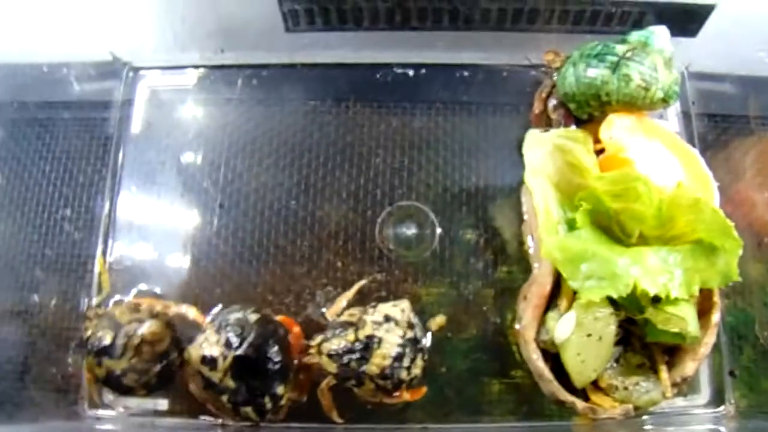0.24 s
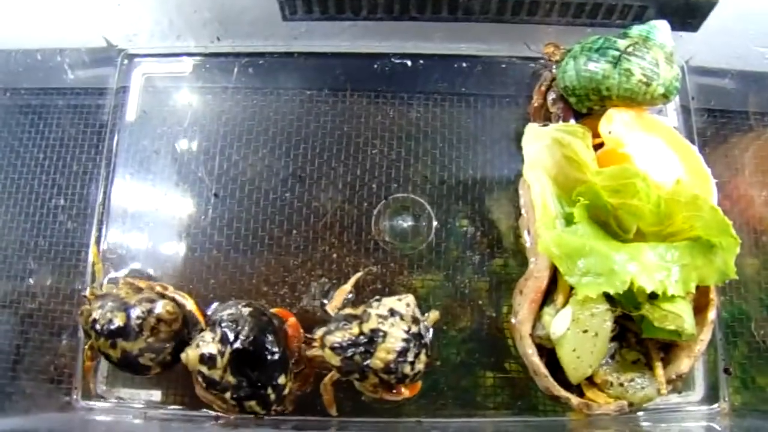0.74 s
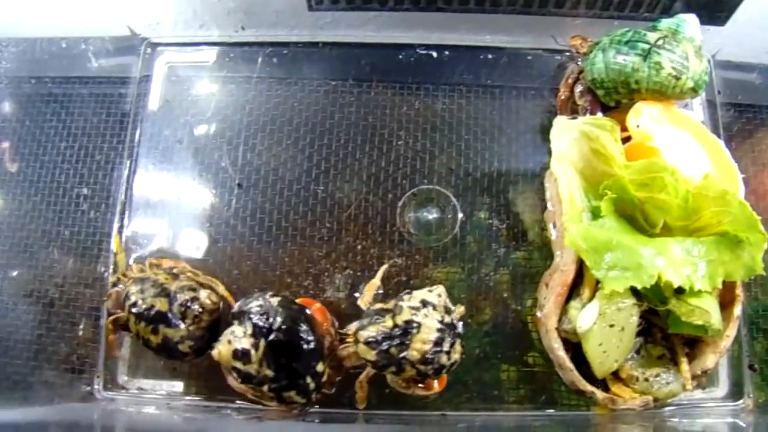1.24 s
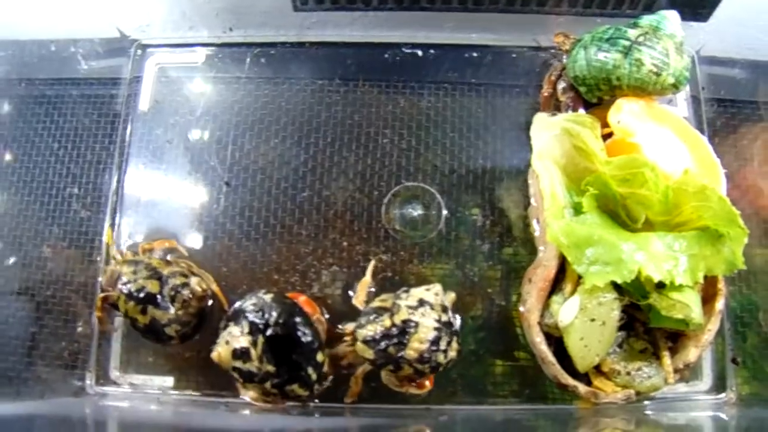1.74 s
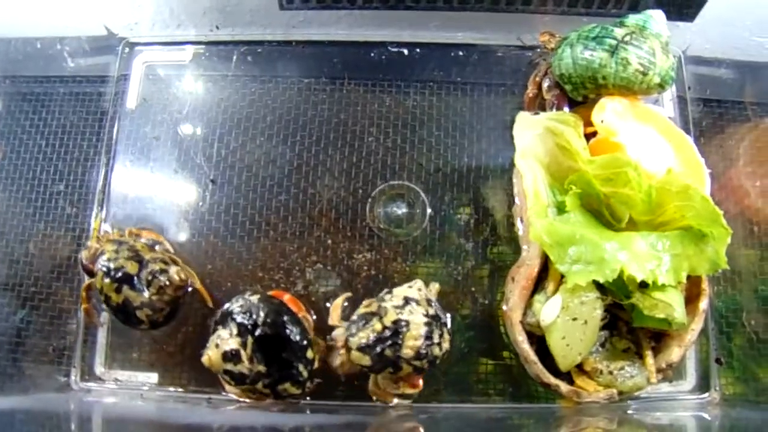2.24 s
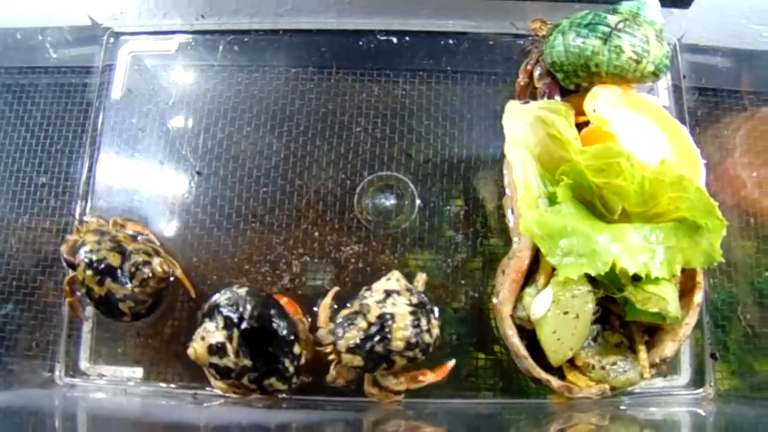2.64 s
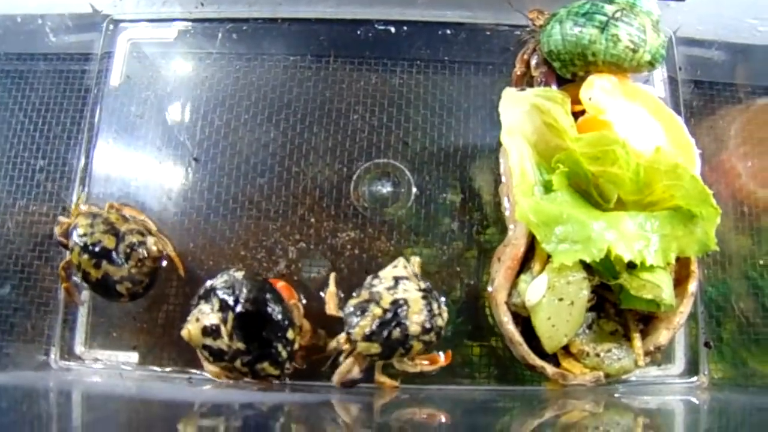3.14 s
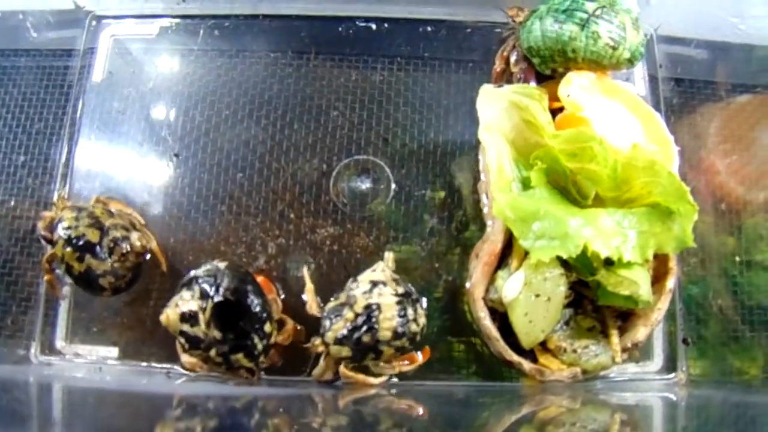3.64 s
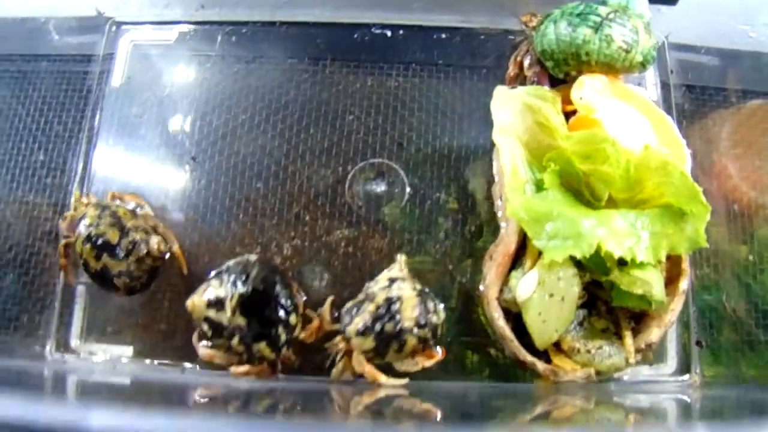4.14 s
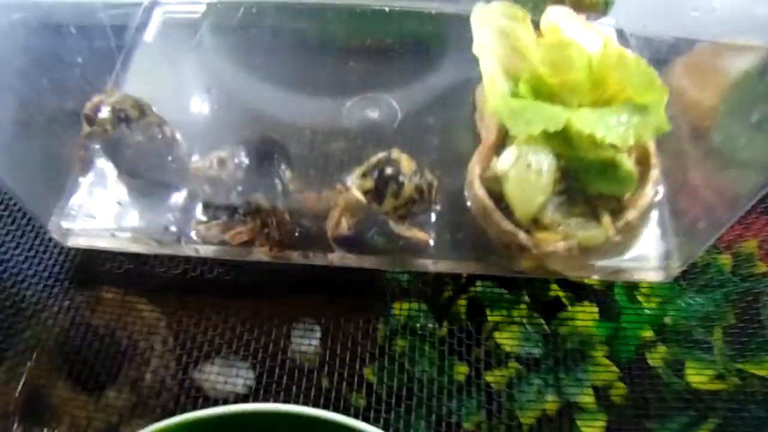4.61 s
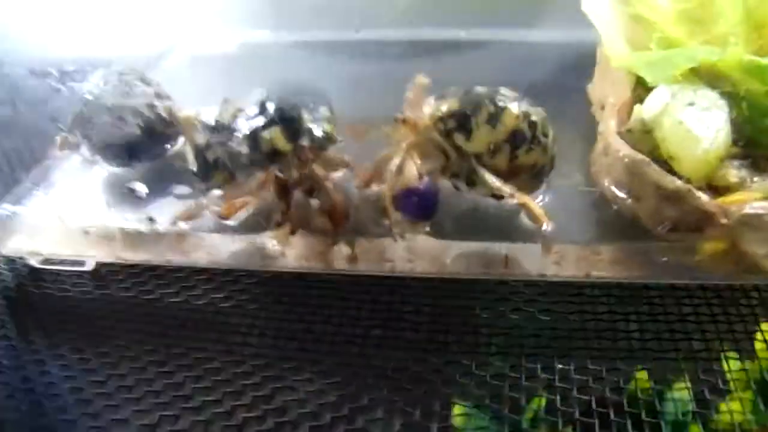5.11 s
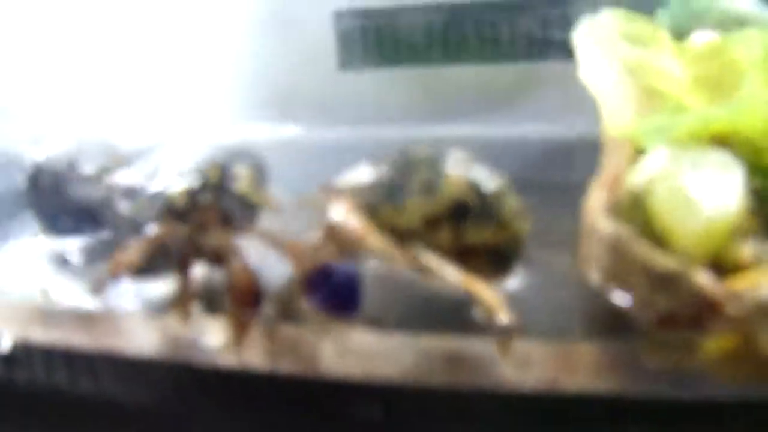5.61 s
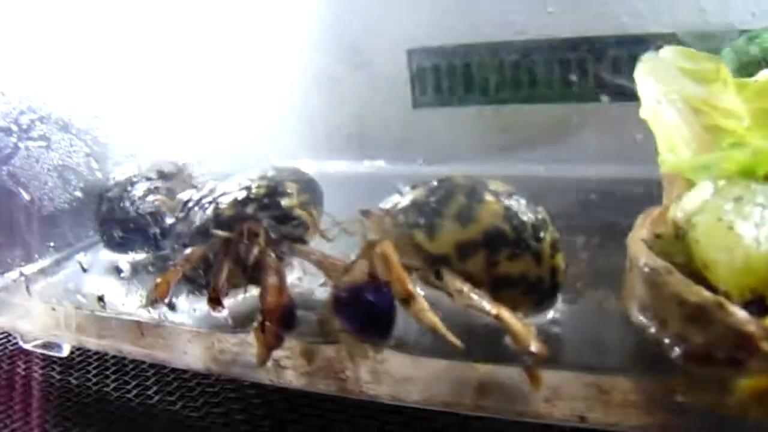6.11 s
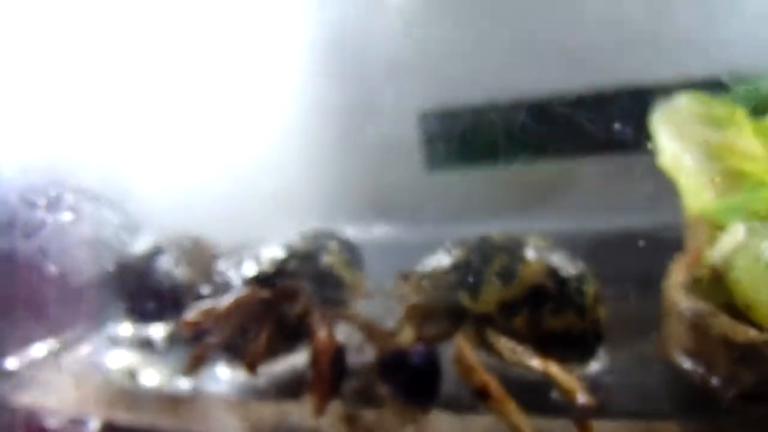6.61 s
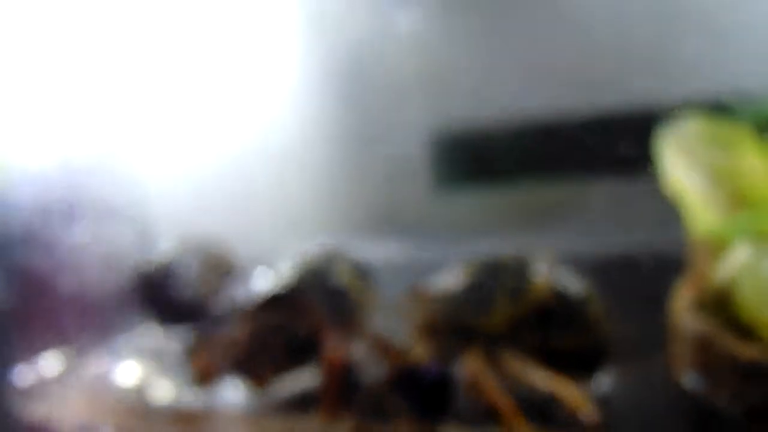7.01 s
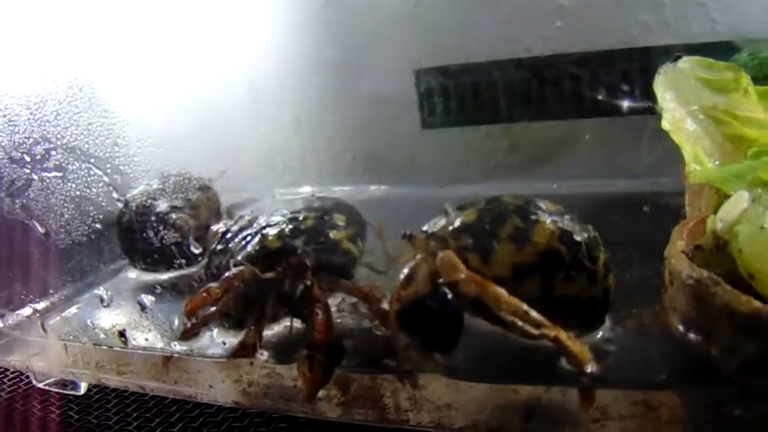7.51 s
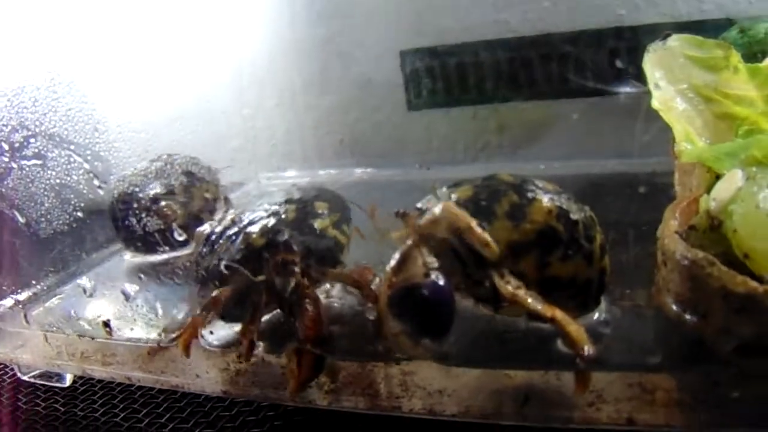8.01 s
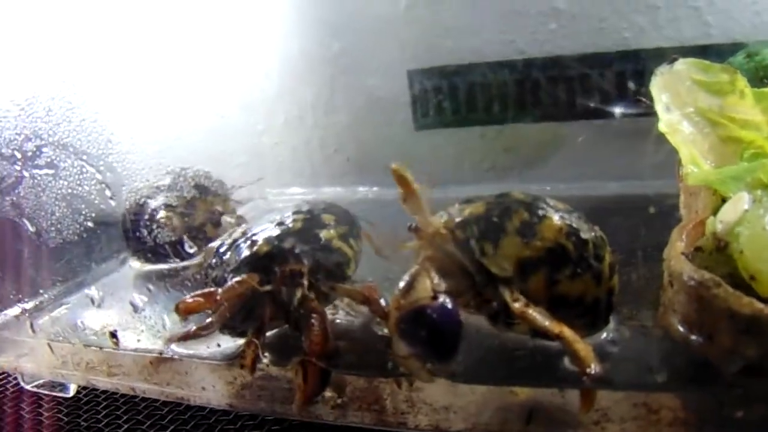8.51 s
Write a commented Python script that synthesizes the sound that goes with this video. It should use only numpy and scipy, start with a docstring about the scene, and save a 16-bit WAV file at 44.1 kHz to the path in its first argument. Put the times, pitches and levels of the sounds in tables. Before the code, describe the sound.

Close, single-channel sound in a quiet room with steady hiss and wavering hum. Hard shells groan briefly across thin plastic, then one drops with a sharp double crack that rings the tub and distorts. A sparse stretch of light leg ticks follows, then irregular shell clicks, dull scuffs and hollow bumps from the middle onward. Rapid camera-motor purrs come and go, and a faint thin whine emerges late.

```python
"""Hermit crabs walk in a thin plastic tub, close under a camera, in a quiet humming room.
From the start the lens motor flutters in bursts (stepped resonances), shells drag (stick-slip) and leg tips tick
(brief impacts). At 1 s a shell drops with a loud clack: it rings the tub, overloads the input and ducks the gain.
Ticks go on, and shells click (damped resonance); from 4.5 s they jostle, shift the tub with dull scuffs and bump
it (knock and floor boom). Hiss, hum and rumble (noise and wavering sines) last throughout; late, a whine fades in."""
import sys
import numpy as np
from scipy import signal
from scipy.io import wavfile
from scipy.ndimage import uniform_filter1d

SR = 44100
rng = np.random.default_rng(int(sys.argv[2]) if len(sys.argv) > 2 else 0)


def to_wav(sig):
    """Store sig (one row per channel, or 1-D mono) as 16-bit WAV at the path in sys.argv[1].

    Samples outside -1..1 are clipped; the rate is SR.
    """
    pcm = np.clip(np.atleast_2d(sig), -1, 1) * 32767
    pcm = np.round(pcm).astype(np.int16)
    wavfile.write(sys.argv[1], SR, pcm.T)  # frames by channels


N = 385875
TIME = np.arange(N) / SR  # s

# Levels in the tables are relative within each kind of sound.
# A shell landing and chattering on the floor: (time [s], level [dB])
DROP_IMPACTS = [(1.0163, -1.5), (1.0195, 0.5), (1.0237, -9.5)]
# Shells bumping the tub: (time [s], level [dB], main pitch [Hz])
TUB_BUMPS = [(4.563, -38, 215), (5.928, -14, 850), (5.940, -19, 518), (6.218, -18, 425),
             (6.367, -26.5, 185), (6.687, -19.5, 1290), (6.690, -18.5, 328), (6.691, -19.5, 547),
             (7.704, -30.5, 199), (8.038, -35, 300)]
# Single touches of shell on shell: (time [s], level [dB], main pitch [Hz], 60 dB decay [s])
SHELL_TOUCHES = [(0.311, -29, 1510, .03), (1.867, -32, 780, .02), (3.272, -34.5, 1520, 0.081),
                 (3.482, -34, 1550, .12), (4.717, -28, 1440, 0.023), (4.887, -32, 1830, .02),
                 (4.939, -23, 1000, 0.025), (5.163, -28.5, 1820, 0.052), (5.761, -30.5, 1186, 0.022),
                 (5.965, -24.5, 1510, 0.11), (6.306, -31, 1270, 0.045), (6.898, -35, 1820, .03),
                 (6.921, -27, 1260, 0.029)]
# Spells of many light shell touches: (start time [s], end time [s], rate [1/s], level [dB])
JOSTLING = [(4.569, 5.25, 14, -36.5), (5.471, 5.55, 43, -36.5), (7.529, 7.6, 30, -38)]
# Hard ticks on plastic: bright ones of leg tips, and duller, steeply tilted snaps of shell rims: (time [s],
# level [dB], 60 dB decay [s], spectral tilt [dB/octave])
TICKS = [(0.152, -35, .07, 1), (0.287, -32, 0.065, -3.5), (0.311, -37, .025, -4.5),
         (0.341, -27.5, .02, -6), (0.985, -37, .06, 2), (2.380, -41.5, .03, 1), (2.982, -27, 0.053, 2),
         (3.481, -30, 0.042, -3), (4.031, -37, .03, 8), (4.420, -35.5, .04, 3.5),
         (5.324, -37.5, .05, 1), (5.760, -38.5, .03, 0), (5.947, -25, 0.02, -6),
         (6.503, -39, .06, -1.5), (6.687, -34.5, .04, -5), (7.703, -29.5, .09, 1.5),
         (7.808, -26.5, 0.017, 0.5), (8.268, -39.5, .045, 1.5)]
# Legs sliding over plastic: (time of maximum [s], length [s], level [dB], spectral tilt [dB/octave])
LEG_SLIDES = [(0.29, .6, -56, -0.5), (0.87, .3, -58, 1), (3.455, .15, -53, -1.5), (5.501, 0.24, -51.5, 0),
              (6.009, 0.055, -48.5, 4), (6.089, 0.094, -49.5, 1), (6.36, .13, -43.5, 0.5),
              (8.03, 0.4, -54, 3), (8.499, 0.16, -53.5, -0.5)]
# Shells dragged along: (time of maximum [s], length [s], level [dB], squeak [Hz])
SHELL_DRAGS = [(0.167, 0.074, -43.5, 570), (0.223, .34, -44.5, 807), (0.321, .13, -36.5, 568),
               (0.543, .1, -50, 720), (0.835, .16, -44, 1006)]
# Tub resonances sung under every drag: (frequency [Hz], width [Hz], level [dB])
GROAN_RESONANCES = [(414, 26, -3), (1510, 32, -12)]
# The tub shifting: (time of maximum [s], length [s], level [dB])
TUB_SCUFFS = [(4.572, .3, -52), (4.948, .5, -50), (6.233, .2, -41.5), (6.37, .24, -41), (7.72, .12, -48.5),
              (8.051, .22, -46)]
# Runs of the lens motor: (start time [s], end time [s], level [dB], mount singing relative to body [dB])
MOTOR_RUNS = [(0.002, 0.09, -50, -23), (0.399, 0.55, -50, -13.5), (1.567, 1.85, -47, -13),
              (4.369, 5.12, -49, -26), (5.137, 5.65, -55, -5), (5.834, 7.42, -53, -5),
              (7.479, 7.66, -53, -14)]
# Resonances of the camera body: (frequency [Hz], nominal width [Hz], level [dB])
CAMERA_RESONANCES = [(325.7, 38.2, -0.5), (453, 107, -8), (692, 120, -6.5), (847, 120, -13.5),
                     (1043, 55, -11.5), (7410, 410, -22.5)]
# Modes of the tub, and of its loaded floor, before any tilt: (frequency [Hz], level [dB], 60 dB decay [s])
TUB_MODES = [(277.8, -20.5, 0.45), (408, 0, 0.12), (496.7, -12, .12), (534, -6, 0.13), (590, -5, .17),
             (602, -11.5, 0.31), (817, -11, .18), (972, -11, 0.1), (1090, -18.5, 0.13), (1175, -18.5, .16),
             (1310, -18, .13), (1530, -15, 0.11), (1600, -7.5, .11), (1745, -12.5, 0.11), (1825, -11, 0.18),
             (2037, -5, .085), (2100, -10, 0.11), (2196, -9, .08), (2320, -7.5, .09), (2724, -10.5, .085),
             (3094, -8, 0.074), (3700, -11.5, 0.083), (3950, -7, .06), (4612, -7.5, 0.067), (5980, -5, .05)]
FLOOR_MODES = [(114, -9, 0.16), (184, -1, 0.44), (208.7, -6, 0.52), (256, -19, 0.099), (339, 0, 0.19),
               (418, -3.5, 0.27), (529, -4.5, 0.53)]
# Spectra before any tilt, of the drop, bumps, clicks, ticks, drags, slides, scuffs and room hiss:
# (frequency [Hz], relative density [dB per Hz])
CRACK_SPECTRUM = [(40, -42), (130, -25.5), (230, -10.5), (420, 3), (900, -3.5), (1300, -4), (2000, 0.5),
                  (6000, -3.5), (14000, -7.5)]
BUMP_SPECTRUM = [(40, -23), (110, -6.5), (190, 4), (500, -4), (1000, -3), (1400, -2.5), (2000, -8.5),
                 (3000, -18), (7000, -29.5), (14000, -46)]
CLICK_SPECTRUM = [(150, -12), (600, -0.5), (1100, 1), (1500, -3.5), (2000, -2), (2700, -10), (3600, -16),
                  (6000, -29), (14000, -42)]
TICK_SPECTRUM = [(200, -14), (1200, -5.5), (3000, 1.5), (7000, -0.5), (13000, -1.5)]
DRAG_SPECTRUM = [(100, -33.5), (280, -11), (420, -2), (900, -0.5), (1600, -9), (3500, -17.5), (7000, -26),
                 (14000, -40)]
SLIDE_SPECTRUM = [(100, -12), (400, -8), (1300, -1), (3000, -7.5), (7000, -10), (14000, -13)]
SCUFF_SPECTRUM = [(40, -8), (110, -4.5), (200, 2), (330, -5), (550, -9.5), (1000, -12), (2500, -25),
                  (14000, -57)]
AIR_SPECTRUM = [(15, -12), (28, -4.5), (62, -4.5), (85, -7), (160, -7.5), (420, -4.5), (760, -10.5),
                (1100, -13.5), (2000, -14.5), (3700, -18.5), (8000, -21.5), (14000, -23)]
# Course of the low rumble: (time [s], level [dB])
RUMBLE_LEVEL = [(0.0, -61), (2.22, -61), (3.46, -55), (4.43, -66), (4.92, -57.5), (8.75, -59)]
# Steady room tones and the late whine: (mean frequency [Hz], level [dB])
HUM_TONES = [(119, -65), (410, -74), (861, -76.5), (2008, -79)]
WHINE_TONES = [(502, -71.5), (1006, -68.5), (1508, -73)]


def amp(db):
    """Level to amplitude: 20 dB is a factor of ten."""
    return 10 ** (np.asarray(db) / 20)


def evened(x):
    """Normalization to an rms of 1."""
    return x / np.sqrt(np.mean(x ** 2) + 1e-20)


def peaked(x):
    """Short-time normalization: the loudest 2 ms get an rms of 1."""
    return x / np.sqrt(uniform_filter1d(x ** 2, size=88).max())


def add(mix, s, sound):
    """Superposition: the sound is added to the mix from time s [s]."""
    start = max(round(s * SR), 0)
    part = mix[start:start + len(sound)]
    part += sound[:len(part)]


def decay(t60, count):
    """Exponential decay: the amplitude falls by 60 dB in t60 [s]."""
    return np.exp(-np.log(1000) * np.arange(count) / SR / t60)


def colour(x, spectrum, tilt_db=0, size=2048):
    """Minimum-phase filtering: the log gain fixes the phase; the spectrum is tilted by tilt_db per octave."""
    octave = np.log2(abs(np.fft.fftfreq(size, 1 / SR)) + 1)
    hz, db = np.transpose(spectrum)
    tilted_db = db + tilt_db * np.log2(hz / hz[-1])
    log_gain = np.log(amp(np.interp(octave, np.log2(hz), tilted_db)))
    taps = np.fft.ifft(np.exp(np.conj(signal.hilbert(log_gain)))).real
    return signal.fftconvolve(x, taps[:size // 2])[:len(x)]


def resonate(x, hz, width):
    """Simple resonance: a band of the given width passes, with gain 1 at its centre."""
    return signal.lfilter(*signal.iirpeak(hz, max(hz / width, .5), SR), x)


def ring(modes, tilt_db=0, count=16000):
    """Modal superposition: a struck body sounds as decaying sines, tilted by tilt_db per octave."""
    t = np.arange(count) / SR
    lowest_hz = modes[0][0]
    out = np.zeros(count)
    for hz, db, t60 in modes:
        level = amp(db + tilt_db * np.log2(hz / lowest_hz))
        sign = rng.choice([-1, 1])
        out += sign * level * decay(t60, count) * np.sin(2 * np.pi * hz * t)
    return out


def contact(t60, snap, count=6000):
    """Impact excitation: one sharp impulse and a dying noise of tiny ones, of unit energy."""
    chatter = rng.standard_normal(count) * decay(max(t60, .004), count)
    chatter /= np.linalg.norm(chatter)
    chatter[0] += snap
    return chatter / np.linalg.norm(chatter)


def friction(top, length, rise, grain_db):
    """Stick-slip friction: uneven grains, and a stroke that swells, then fades: (start [s], grains, stroke)."""
    u = np.arange(0, length, 1 / SR) / length
    slips = evened(uniform_filter1d(rng.standard_normal(len(u)), size=130))  # smoothed over 3 ms
    grains = evened(rng.standard_normal(len(u)) * amp(grain_db * slips))
    stroke = np.minimum(u / rise, ((1 - u) / (1 - rise)) ** 1.6)  # rise is a share of the length
    return top - rise * length, grains, stroke


def scatter(start, end, per_s, db, spread_db):
    """Jittered succession: one contact at random in each turn: rows (time [s], level [dB], shade -1 to 1)."""
    turns = np.arange(start, end, 1 / per_s)
    late, size, shade = rng.random((len(turns), 3)).T
    return zip(turns + late / per_s, db + spread_db * (2 * size - 1), 2 * shade - 1)


def shell_drop():
    """Impact on a resonant body: the shell cracks down, chatters, and excites all modes of the tub."""
    out = np.zeros(N)
    for s, db in DROP_IMPACTS:
        crack = colour(contact(0.034, snap=0.18), CRACK_SPECTRUM, tilt_db=0.9)
        add(out, s, amp(db) * peaked(crack))
    landing = DROP_IMPACTS[1][0]
    echoes = colour(contact(.2, snap=0, count=12000), CRACK_SPECTRUM, tilt_db=-1.5)  # in the tub
    room_tail = colour(contact(0.42, snap=0, count=24000), DRAG_SPECTRUM, tilt_db=-3.5)
    add(out, landing, amp(-5.0) * peaked(ring(TUB_MODES)))
    add(out, landing, amp(-31.5) * peaked(echoes))
    add(out, landing, amp(-33.0) * peaked(room_tail))
    return out


def bumps():
    """Coupled resonators: a shell knocks on the tub, the floor booms on, the walls ring, the room answers."""
    out = np.zeros(N)
    soft_hz = 195  # low bumps are soft: longer rattle, louder and deeper boom
    for s, db, hz in TUB_BUMPS:
        octaves = np.log2(hz / soft_hz)
        rattle_s = 0.087 * (hz / soft_hz) ** -0.6
        knock = colour(contact(rattle_s, snap=0.59, count=16000), BUMP_SPECTRUM)
        knock = peaked(knock + 4.9 * resonate(knock, hz, 48))
        boom = amp(-7 - 5 * octaves) * peaked(ring(FLOOR_MODES, tilt_db=-1 + 3.4 * octaves))
        walls = amp(-18) * peaked(ring(TUB_MODES, tilt_db=-3.0))
        tail = colour(contact(.35, snap=0, count=16000), DRAG_SPECTRUM, tilt_db=-1.5)
        add(out, s, amp(db - 6) * (knock + boom + walls + amp(-26) * peaked(tail)))
    return out


def shell_clicks():
    """Damped resonance: shells touch, giving a short click with one emphasized pitch."""
    out = np.zeros(N)
    touches = list(SHELL_TOUCHES)
    middle_hz, spread_octaves, light_t60 = 1610, .35, .03
    for spell in JOSTLING:
        for s, db, shade in scatter(*spell, spread_db=0.5):
            touches.append((s, db, middle_hz * 2 ** (spread_octaves * shade), light_t60))
    for s, db, hz, t60 in touches:
        touch = colour(contact(t60, snap=0.45), CLICK_SPECTRUM)
        add(out, s, amp(db - 8.0) * peaked(touch + 1.5 * resonate(touch, hz, 256)))
    return out


def legs():
    """Impact and sliding friction: hard leg tips and shell rims tick on the plastic, and legs now and then
    slide over it."""
    out = np.zeros(N)
    ticks = list(TICKS)
    for s, db, shade in scatter(start=2.0, end=8.7, per_s=2.2, db=-46, spread_db=2):  # lighter steps
        ticks.append((s, db, .035, 2.5 * shade))
    for s, db, t60, tilt_db in ticks:
        tick = colour(contact(t60, snap=0.31), TICK_SPECTRUM, tilt_db)
        add(out, s, amp(db - 6.0) * peaked(tick))
    for top, length, db, tilt_db in LEG_SLIDES:
        start, grains, stroke = friction(top, length, rise=.22, grain_db=3.0)
        add(out, start, amp(db) * stroke * evened(colour(grains, SLIDE_SPECTRUM, tilt_db)))
    return out


def drags():
    """Friction-driven resonance: a dragged shell rubs the tub's modes into a groan, with squeak and grit."""
    out = np.zeros(N)
    body = ring(TUB_MODES)
    for top, length, db, squeak_hz in SHELL_DRAGS:
        start, grains, stroke = friction(top, length, rise=.3, grain_db=3.5)
        rung = signal.fftconvolve(grains, body)[:len(grains)]
        rubbed = 0.42 * evened(rung) + evened(grains)
        sound = evened(colour(rubbed, DRAG_SPECTRUM))
        sound += amp(-17.5) * evened(colour(grains, TICK_SPECTRUM))  # grit
        for hz, width, sing_db in GROAN_RESONANCES + [(squeak_hz, 45, -8)]:
            sound += amp(sing_db) * evened(resonate(resonate(grains, hz, width), hz, 3 * width))
        add(out, start, amp(db) * stroke * sound)
    return out


def scuffs():
    """Low-frequency friction: the whole tub shifts a little, and the dull rubbing partly rings in its floor."""
    out = np.zeros(N)
    body = ring(FLOOR_MODES)
    for top, length, db in TUB_SCUFFS:
        start, grains, stroke = friction(top, length, rise=.2, grain_db=3)
        rung = signal.fftconvolve(grains, body)[:len(grains)]
        sound = evened(colour(grains, SCUFF_SPECTRUM)) + 0.56 * evened(rung)
        add(out, start, amp(db) * stroke * sound)
    return out


def focus_motor():
    """Periodic excitation: near-even lens steps, each a short rasp ringing in the camera body and lens mount."""
    steps_per_s = 30
    rasps = np.array([contact(.04, snap=.7, count=3500) for _ in range(24)])

    def rung(hz, width):
        """Cascaded resonance: each rasp rings at one frequency, with unit energy."""
        wave = resonate(resonate(rasps, hz, 1.18 * width), hz, 4 * width)
        return wave / np.linalg.norm(wave, axis=1, keepdims=True)

    body = sum(amp(db) * rung(hz, width) for hz, width, db in CAMERA_RESONANCES)
    mount = rung(673, 28.8)
    unit_power = np.sqrt(SR / steps_per_s)  # unit energy per step becomes unit mean power
    out = np.zeros(N)
    for start, end, db, sing_db in MOTOR_RUNS:
        for s in np.arange(start, end, 1 / steps_per_s):
            late, size = rng.standard_normal(2)
            pick = rng.integers(len(rasps))
            step = unit_power * (body[pick] + amp(sing_db) * mount[pick])
            add(out, s + .0013 * late, amp(db - 3.0 + 0.53 * size) * step)
    return out


def wavering_tone(hz, db, waver_hz):
    """Frequency modulation: a sine whose frequency drifts at random about its mean."""
    drift = np.interp(TIME, np.linspace(0, TIME[-1], num=80), rng.standard_normal(size=80))
    phase = 2 * np.pi * np.cumsum(hz + waver_hz * drift) / SR
    return amp(db) * np.sqrt(2) * np.sin(phase)


def room():
    """Background noise and tones: filtered hiss, a swelling low rumble, a wavering hum and a thin late whine."""
    air = amp(-54.5) * evened(colour(rng.standard_normal(N), AIR_SPECTRUM, size=8192))
    low_noise = evened(resonate(resonate(rng.standard_normal(N), 44, 9.7), 48, 25))
    rumble = amp(np.interp(TIME, *np.transpose(RUMBLE_LEVEL))) * low_noise
    hum = sum(wavering_tone(hz, db, waver_hz=1.3) for hz, db in HUM_TONES)
    whine = sum(wavering_tone(hz, db, waver_hz=3.01) for hz, db in WHINE_TONES)
    fade_in = np.interp(TIME, [5.5, 7.8], [0, 1])
    return air + rumble + hum + whine * fade_in


def scene():
    """Linear superposition of all sources, as one channel."""
    crabs = shell_drop() + bumps() + shell_clicks() + legs() + drags() + scuffs()
    return (crabs + focus_motor() + room())[None]


def record(dry):
    """Saturation, gain control and band limiting: peaks clip, and the ducked gain recovers only in part."""
    clipped = np.clip(dry[0] * amp(3.0), -1, 1)
    over = np.clip(2 * abs(clipped) - 1, 0, 1)  # how far the sound passes half of full scale
    release = np.exp(-TIME / 1.4)  # time constant 1.4 s
    recovering_db = 6.0 * release * np.maximum.accumulate(over / release)
    held_db = 3.125 * np.maximum.accumulate(over)
    pole = np.exp(-1 / (.06 * SR))  # the gain moves smoothly, with a time constant of 60 ms
    duck_db = signal.lfilter([1 - pole], [1, -pole], recovering_db + held_db)
    ducked = clipped * amp(-duck_db)
    low_pass = signal.firwin(301, 14250, window=("kaiser", 9), fs=SR)  # edge at 14250 Hz
    return signal.oaconvolve(ducked, low_pass, "same")[None]


dry = scene()
out = record(dry)
to_wav(out)
```